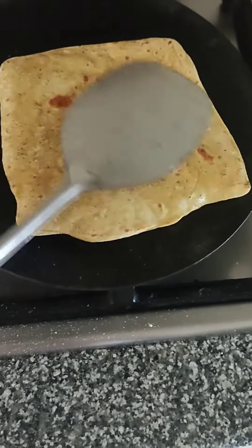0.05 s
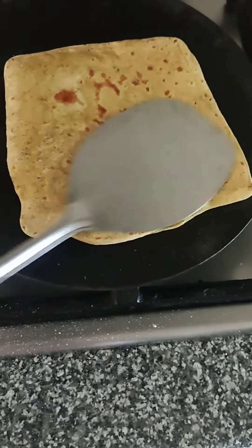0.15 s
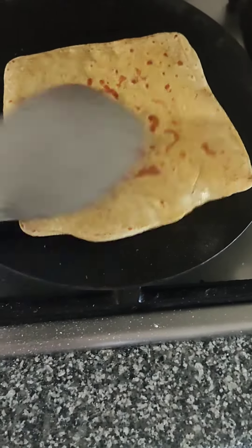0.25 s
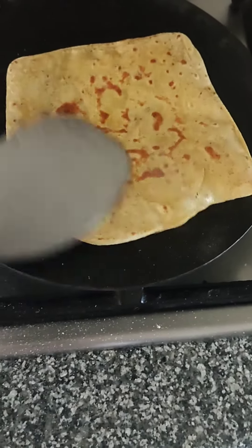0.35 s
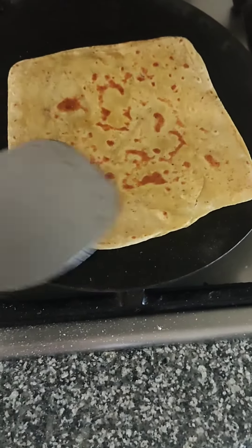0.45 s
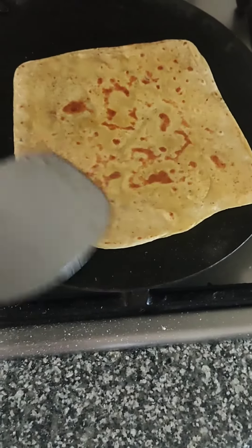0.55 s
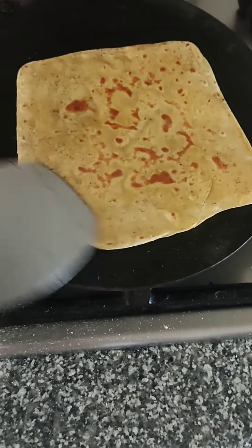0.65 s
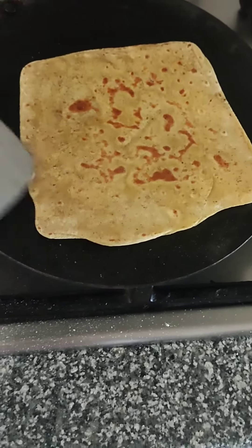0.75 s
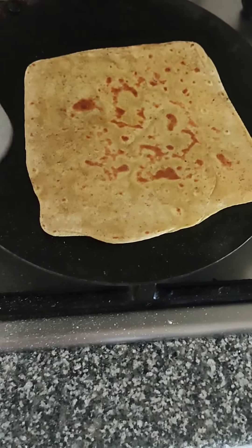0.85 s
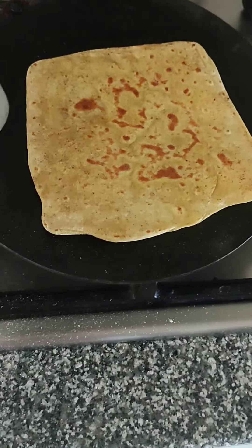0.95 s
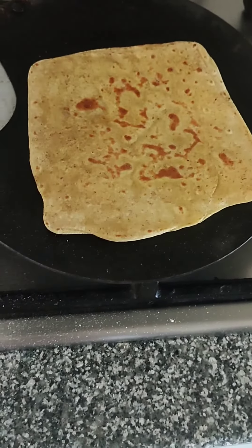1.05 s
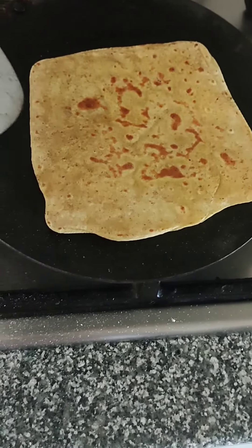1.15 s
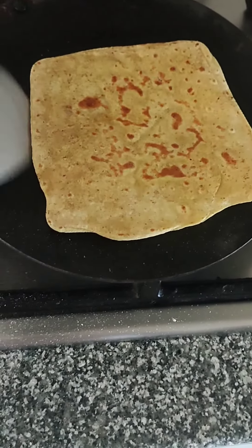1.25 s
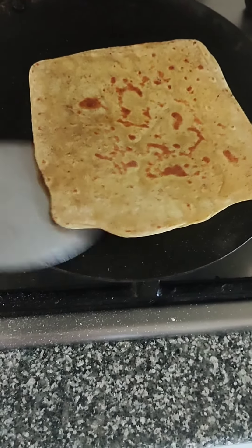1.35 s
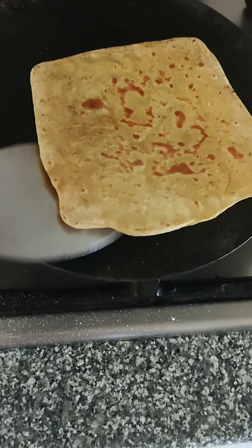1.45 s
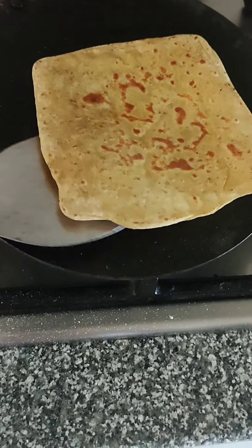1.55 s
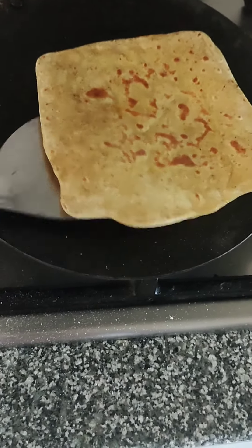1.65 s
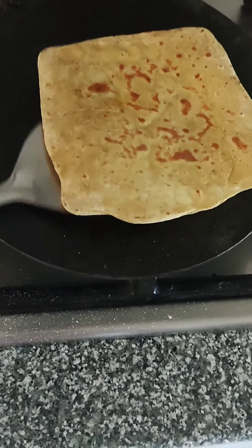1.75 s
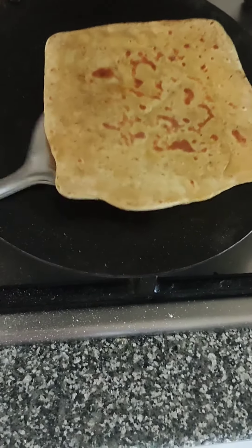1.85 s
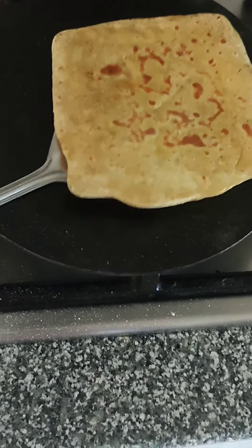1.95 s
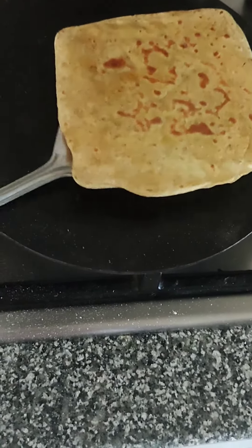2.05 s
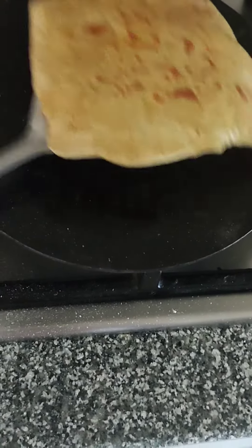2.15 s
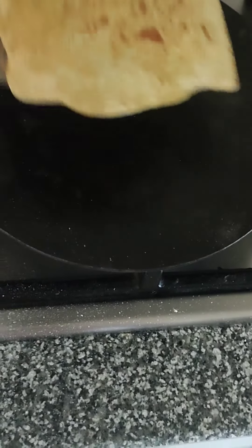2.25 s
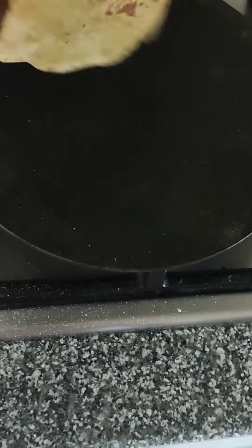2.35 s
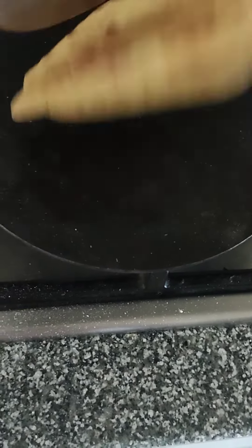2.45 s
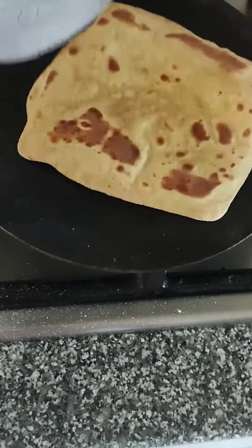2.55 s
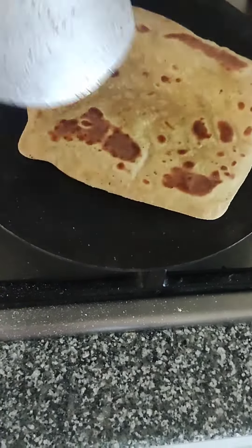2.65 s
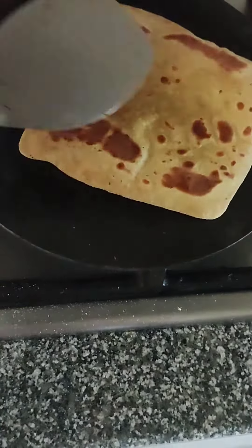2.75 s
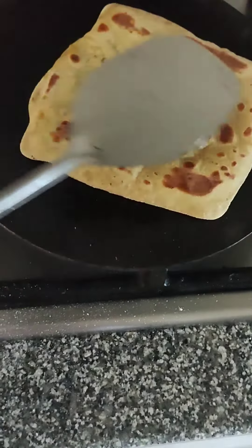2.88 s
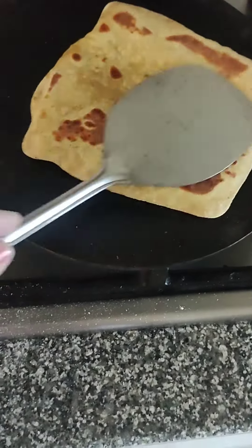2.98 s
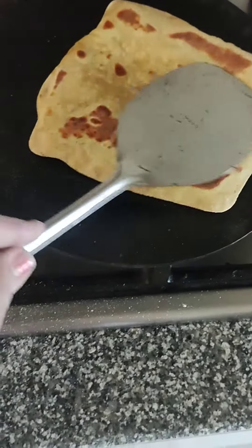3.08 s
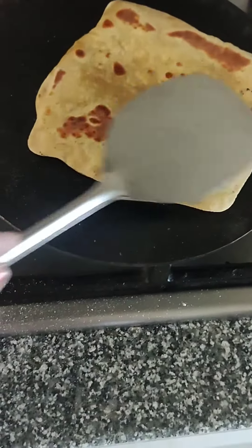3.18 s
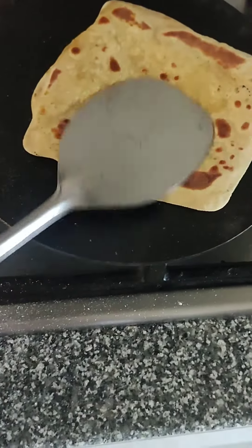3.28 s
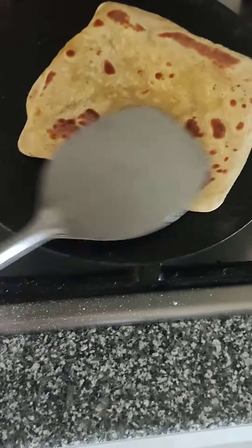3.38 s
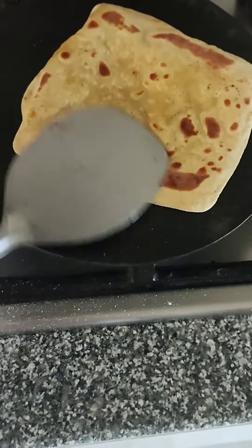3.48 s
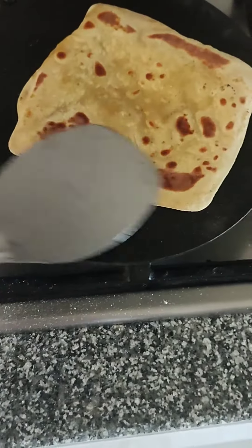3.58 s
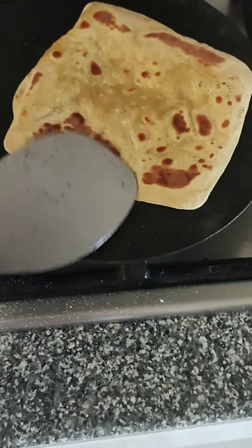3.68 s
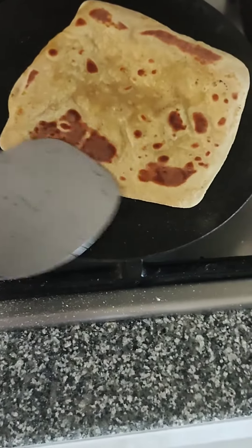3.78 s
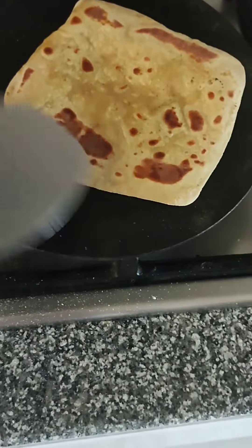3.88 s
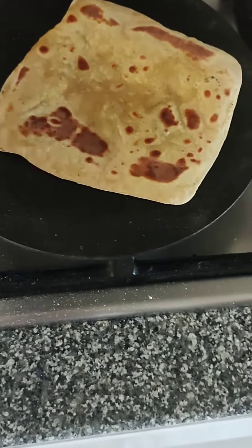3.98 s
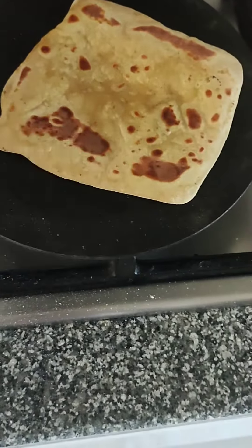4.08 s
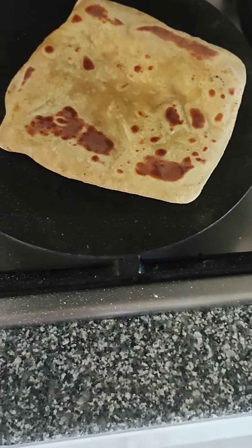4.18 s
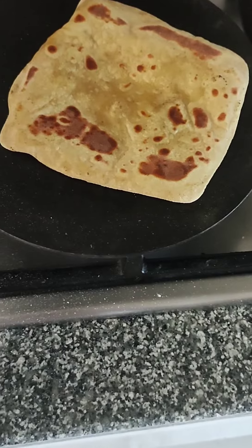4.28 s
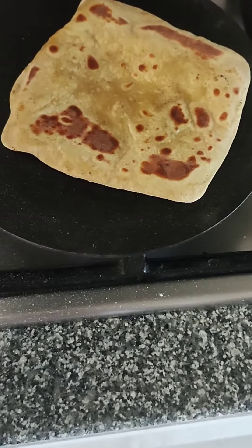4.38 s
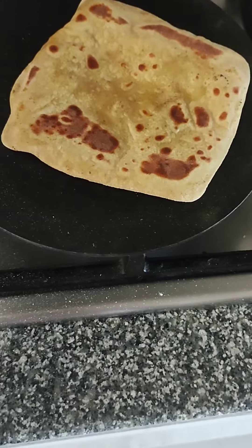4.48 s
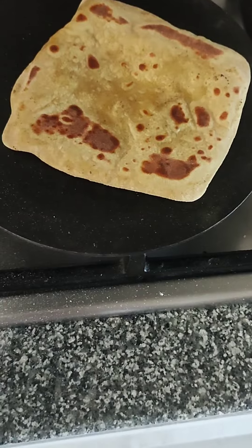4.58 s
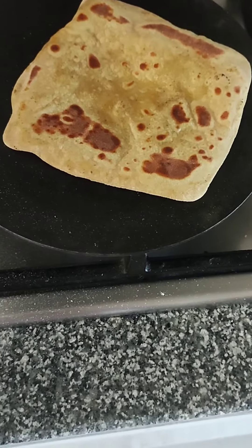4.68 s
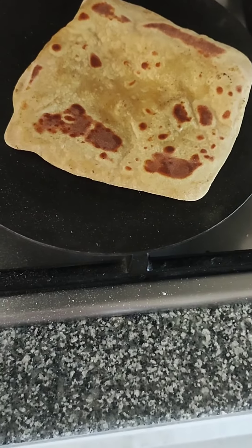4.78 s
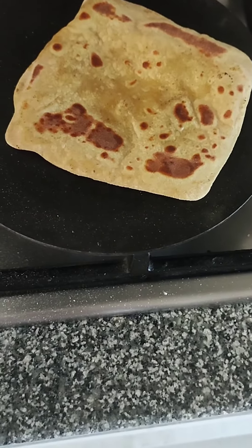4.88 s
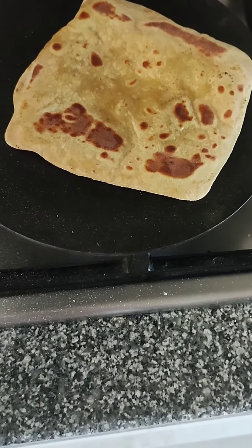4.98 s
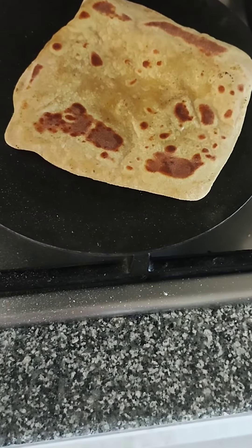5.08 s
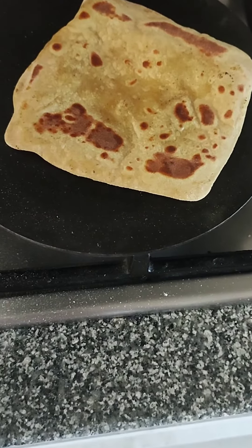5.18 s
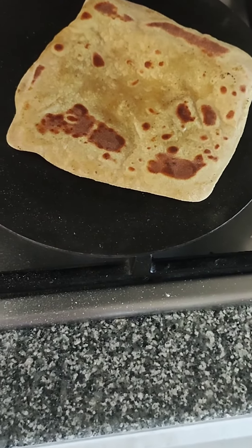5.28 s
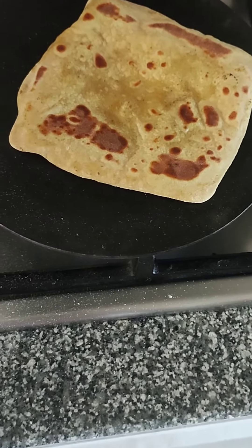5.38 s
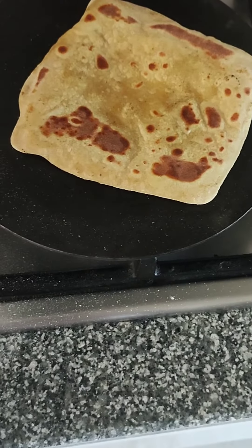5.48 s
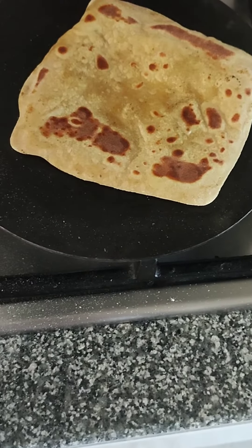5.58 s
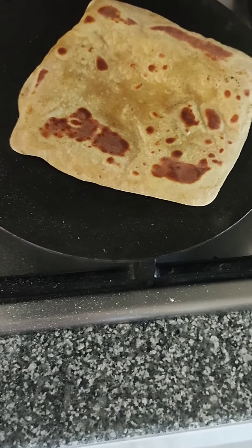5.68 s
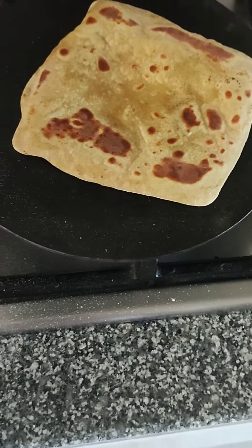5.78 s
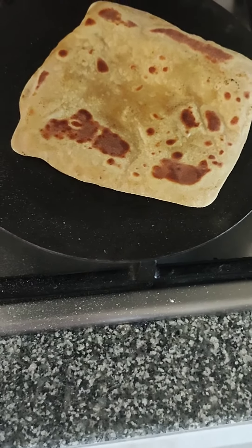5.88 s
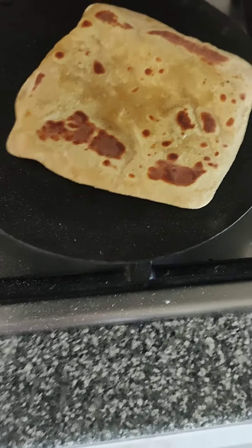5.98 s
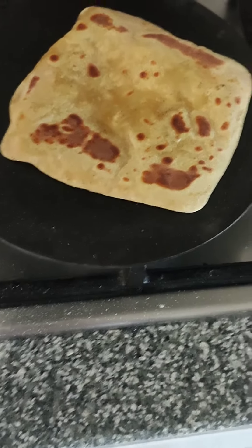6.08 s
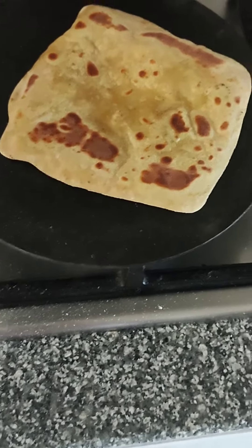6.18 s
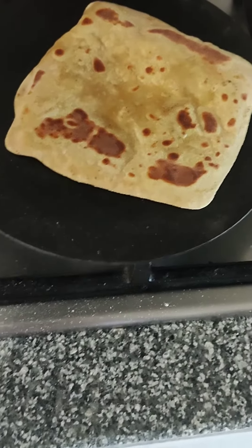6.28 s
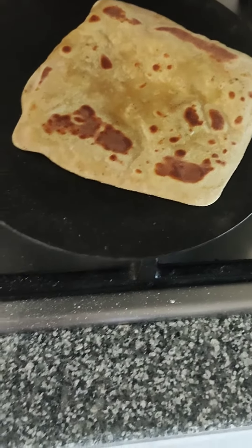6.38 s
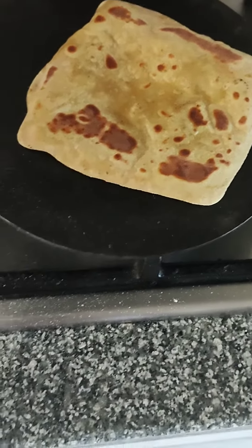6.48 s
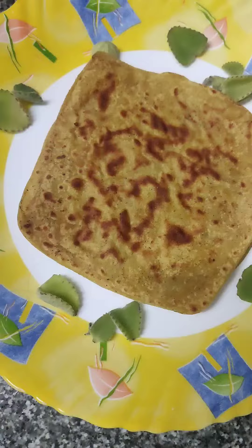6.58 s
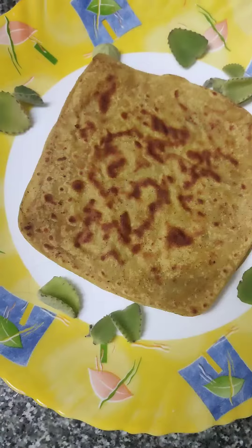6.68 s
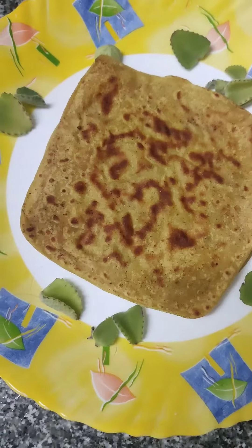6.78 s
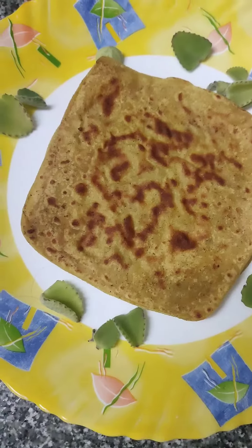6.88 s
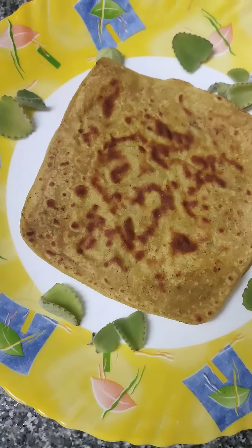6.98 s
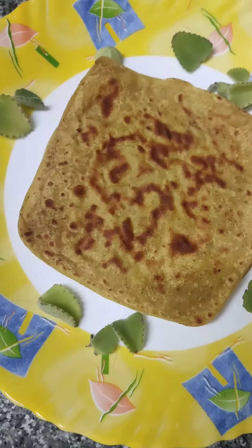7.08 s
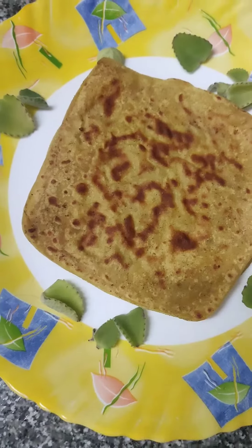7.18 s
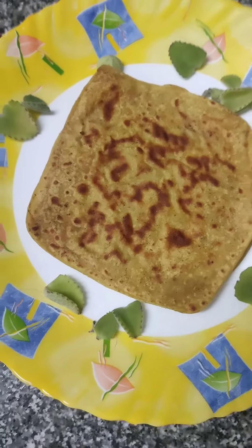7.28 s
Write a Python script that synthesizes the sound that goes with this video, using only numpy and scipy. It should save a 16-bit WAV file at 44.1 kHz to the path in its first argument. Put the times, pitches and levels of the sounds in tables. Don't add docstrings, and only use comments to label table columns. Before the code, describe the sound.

A metal spatula rubs crisp flatbread, scrapes and rings on an iron griddle, flips it with a slap, then fat sizzles before a quiet humming room.

```python
import sys
import numpy as np
from scipy import signal
from scipy.io import wavfile
from scipy.ndimage import uniform_filter1d

SR = 44100
rng = np.random.default_rng(int(sys.argv[2]) if len(sys.argv) > 2 else 0)


def attenuation_scalar(level_db):
    decades = np.asarray(level_db, float) / 20
    return 10 ** decades


def pcm_store(signal):
    levels = np.round(np.clip(np.atleast_2d(signal), -1, 1) * 32767)
    wavfile.write(sys.argv[1], SR, levels.astype(np.int16).T)


N = 323691
CUT_S = 6.557
LAG = 6
EDGE_HZ = 14330


def evened(x):
    return x / np.sqrt(np.mean(x ** 2) + 1e-20)


def read(points, hz):
    f, value = np.transpose(points)
    return np.interp(np.log(hz + 1), np.log(f + 1), value)


def add(mix, s, sound):
    part = mix[..., round(s * SR):][..., :sound.shape[-1]]
    part += sound[..., :part.shape[-1]]


def band(x, lo_hz, hi_hz):
    return signal.sosfilt(signal.butter(2, [lo_hz, min(hi_hz, .45 * SR)], "band", fs=SR, output="sos"), x)


# frequency in Hz, likeness from 0 to 1.
SAME = [(60, 0.75), (130, 0.92), (290, 0.96), (640, 0.2), (1400, 0.31), (3080, 0.24), (6760, 0.2),
        (14800, 0.27)]


def hiss(colour, same=SAME, patchy_db=3.5, flicker_db=3.8, size=512, span=(0, 8)):
    out = np.zeros((2, N))
    part = out[:, span[0] * SR:span[1] * SR]
    frames, hz = 4 * part.shape[1] // size + 5, np.fft.rfftfreq(size, 1 / SR)
    a, b, c, d, patches = rng.standard_normal((frames, len(hz), 5)).T
    patches = uniform_filter1d(uniform_filter1d(patches, 6, 0), 12, 1)
    flicker = uniform_filter1d(rng.standard_normal(frames), 3)
    field_db = patchy_db * evened(patches) + flicker_db * evened(flicker)
    alike = np.clip(read(same, hz), -1, 1)[:, None]
    later = np.exp(-2j * np.pi * hz * LAG / SR)[:, None]
    left = a + 1j * b
    right = alike * left * later + np.sqrt(1 - alike ** 2) * (c + 1j * d)
    level = attenuation_scalar(read(colour, hz)[:, None] + field_db) * (hz < EDGE_HZ)[:, None]
    z = np.array([left, right]) * level
    part[:] = evened(signal.istft(z, nperseg=size, noverlap=3 * size // 4)[1][:, :part.shape[1]])
    return out


def strokes(rows):
    t = np.arange(0, N + 64, 64) / SR
    peak, db, rise, fall, treble_db = np.transpose(rows)[:, :, None]
    away = np.where(t < peak, (peak - t) / rise, (t - peak) / fall)
    power = attenuation_scalar(db - 22 * away ** 1.51) ** 2
    both = power, power * attenuation_scalar(2 * treble_db)
    return [np.interp(np.arange(N) / SR, t, np.sqrt(p.sum(0))) for p in both]


def pressed(sound, rows, split_hz=5000):
    low = signal.sosfiltfilt(signal.butter(2, split_hz, fs=SR, output="sos"), sound)
    body, treble = strokes(rows)
    return body * evened(low) + treble * evened(sound - low)


def ring(modes, longer=0.88, tilt_db=0., seconds=.3):
    t = np.arange(round(seconds * SR)) / SR
    hz, db, t60 = np.transpose(modes)[:, :, None]
    level = attenuation_scalar(db + tilt_db * np.log2(hz / 3000) - 60 * t / (np.minimum(t60, .3) * longer))
    left, apart = rng.random((2, *hz.shape))
    right = left + (apart - .5) * np.minimum(hz / 1200, 1)
    return np.array([(level * np.sin(2 * np.pi * (hz * t + turn))).sum(0) for turn in (left, right)])


def blade(modes, slips):
    step, out = np.arange(slips.shape[1]) / 700, np.zeros(slips.shape)
    for hz, width, db in modes:
        r = np.exp(-np.pi * width / SR)
        wander = evened(uniform_filter1d(rng.standard_normal((2, len(step) // 700 + 2)), 3))
        swell, drift = (np.interp(step, np.arange(len(w)), w) for w in wander)
        turn = np.exp(2j * np.pi * np.cumsum(hz * (1 + .016 * drift)) / SR)
        rung = turn * signal.lfilter([1 - r], [1, -r], slips / turn)
        out += attenuation_scalar(db + 2.2 * swell) * rung.real
    return evened(out)


# frequency in Hz, level in dB per Hz.
TABLE = [(35, -35), (60, -15.5), (104, -13.5), (157, -29.5), (189, -21), (272, -32.5), (358, -23),
         (461, -32), (493, -28), (635, -29.5), (1030, -35.5), (1910, -39.5), (2400, -48.5), (3700, -50.5),
         (14300, -56.5)]
# frequency in Hz, likeness from 0 to 1.
TABLE_SAME = [(60, 0.4), (130, 0.78), (290, 0.78), (640, 0.056), (1400, 0.022), (3080, 0.091), (6760, 0.05),
              (14800, 0.03)]


def table():
    t = np.arange(N) / SR
    waver = attenuation_scalar(2.5 * evened(uniform_filter1d(rng.standard_normal(N), 1500)))
    hum = attenuation_scalar(-54.5) * np.sqrt(2) * waver * np.sin(2 * np.pi * 104.5 * t)
    room = attenuation_scalar(-55) * hiss(TABLE, TABLE_SAME, patchy_db=1.2, flicker_db=.7, size=1024, span=(6, 8))
    back_s, fade_s = 6.585, .26
    return (room + hum) * np.clip((t - back_s) / fade_s, 0, 1) ** 2


# frequency in Hz, level in dB per Hz.
AIR = [(150, -13.5), (200, -5), (270, 0), (454, 0.5), (683, -12.5), (886, -5.5), (1330, -14), (2850, -17),
       (4200, -20), (7200, -12), (14300, -53.5)]
LOWS = [(60, -24), (100, -2.5), (135, 10.5), (165, -6.5), (190, -34)]
SUBS = [(18, -5), (36, 1), (48, -3.5), (70, -4.5), (110, -43.5)]
# time in seconds, rumble level in dB.
SHAKE = [(0, -62), (.8, -57), (1.1, -58), (1.44, -59), (1.85, -60), (2.15, -52), (3.23, -54), (3.73, -58),
         (4.11, -58), (5.2, -61), (5.45, -62), (6.56, -61)]


def stove_air():
    air = attenuation_scalar(-62) * hiss(AIR, patchy_db=1.8, flicker_db=.6, size=2048)
    drone = attenuation_scalar(-62) * hiss(LOWS, patchy_db=1.0, flicker_db=3.0, size=2048)
    shake = attenuation_scalar(np.interp(np.arange(N) / SR, *np.transpose(SHAKE)))
    return air + drone + shake * hiss(SUBS, patchy_db=-2.5, flicker_db=5.5, size=4096)


# start in seconds, length in seconds, level in dB.
SIZZLE = [
    (4.24, 0.67, -66.5),
    (4.914, 0.25, -67),
    (5.315, 0.716, -56.5),
    (6.187, 0.46, -56.5),
]
# frequency in Hz, level in dB per Hz.
FIZZ = [(1470, -41), (2500, -20), (4290, -17), (5330, -10.5), (6290, -0.5), (7410, -2.5), (8680, -6.5),
        (10500, -9), (12600, -3.5), (14400, -8.5), (15000, -33.5)]


def fat():
    t = np.arange(N) / SR
    power = attenuation_scalar(2 * -72.5) * (t > 3.85)
    for s, length, db in SIZZLE:
        power = power + attenuation_scalar(2 * (db - 7 * (t - s))) * (t > s) * (t < s + length)
    level = uniform_filter1d(np.sqrt(power), 400)
    return level * hiss(FIZZ, patchy_db=.8, flicker_db=.7, span=(3, 7))


# start in seconds, peak in dB, pitch in Hz, t60 in seconds.
THUDS = [
    (0.251, -38, 117, 0.066),
    (0.354, -40, 278, 0.056),
    (0.985, -40, 146, 0.09),
    (1.719, -43.5, 246, 0.11),
    (3.169, -39, 129, 0.041),
    (4.7, -46.5, 240, 0.093),
    (5.35, -44.5, 247, 0.14),
    (5.692, -56, 370, 0.02),
]


def thuds():
    out, t = np.zeros((2, N)), np.arange(round(.2 * SR)) / SR
    for s, db, hz, t60 in THUDS:
        add(out, s, attenuation_scalar(db - 60 * t / t60) * np.sin(2 * np.pi * hz * t) * np.minimum(t / 0.00039, 1))
    return out


def creak(db, pan_db, snap_db):
    t, (gap, share, low) = np.arange(4000) / SR, rng.random(3)
    pull_s = 0.0033

    def pull(s, wide):
        return -np.exp(-((t - s) / wide) ** 2)

    second = (.5 + .6 * share) * pull(pull_s + .0013 + .0011 * gap, .00045)
    bulge = -.3 * pull(.0008, .0006)
    slips = pull(pull_s, .00022) + second + bulge
    case_hz = 124 * (0.87 + 0.2 * low)
    body = 0.39 * np.sin(2 * np.pi * case_hz * (t - pull_s) + 4.43) * attenuation_scalar(-60 * t / 0.11)
    late = np.clip((t - pull_s) / .0003, 0, 1)
    snap = band(rng.standard_normal((2, len(t))), 1100, 3300) * attenuation_scalar(17 + snap_db - 60 * t / 0.031) * late
    after = band(rng.standard_normal(len(t)), 192, 783) * attenuation_scalar(10.5 - 60 * t / 0.051)
    start = np.minimum(t / 0.0011, 1)
    return attenuation_scalar(db - 0.5) * attenuation_scalar([[pan_db / 2], [-pan_db / 2]]) * (slips + start * (body + snap + after))


# start in seconds, peak in dB, left-right in dB, snap in dB.
CREAKS = [(0.247, -40, 2, -6), (0.352, -39, -1.0, -16), (0.979, -37, 2, -12), (1.239, -37, 1.5, -11),
          (1.648, -36.5, 1.5, -11), (1.79, -40.5, 0, -12), (1.817, -35.5, 1.5, -13),
          (2.271, -50.5, -5, -14), (2.385, -39, 0.5, -22), (2.475, -35, 1.5, -18), (2.895, -42, 0, -19),
          (3.107, -43, 1, -17), (3.161, -36.5, 3, -20), (3.194, -43, -2.0, -25), (3.324, -42, 0.5, -13),
          (3.675, -42, 0.0, -9), (4.017, -41, 1, -22), (4.115, -59, -2.0, -22), (4.22, -44, -1, -22),
          (4.261, -35.5, 0, -16.5), (4.325, -46, 0, -29), (4.43, -44, -1, -24), (4.628, -45, 1, -23),
          (4.664, -43, 0, -6), (4.848, -44, -2.5, -26), (5.092, -42.5, 1.5, -20), (5.279, -35, 0.5, -17),
          (5.461, -41, 1, -17), (5.69, -37.5, 1.5, -16.5), (5.984, -40.5, 1.5, -17.5),
          (6.188, -44.5, -1.5, -26), (6.207, -37, 0, -20), (6.549, -40, 4, -16)]
# start in seconds, peak in dB, left-right in dB, snap in dB.
WRIST_CREAK = (2.549, -43, 0, -16)


def creaks():
    out = np.zeros((2, N))
    for s, *row in CREAKS + [WRIST_CREAK]:
        add(out, s, creak(*row))
    return out


# frequency in Hz, t60 in seconds.
KITCHEN = [(120, 0.62), (400, 0.52), (1000, 0.49), (2500, 0.45), (6000, 0.42), (14000, 0.16)]


def kitchen(x):
    echoes = np.zeros((2, SR // 2))
    at = np.arange(80, SR // 2 - 20, 20) + rng.integers(0, 20, (2, (SR // 2 - 81) // 20))
    np.put_along_axis(echoes, at, rng.choice([-1., 1.], at.shape), 1)
    echoes[1] += band(echoes[0] - echoes[1], 40, 580)
    hz, t, z = signal.stft(echoes, SR, nperseg=256)
    tail = signal.istft(z * attenuation_scalar(-60 * t / read(KITCHEN, hz)[:, None]), SR, nperseg=256)[1]
    return signal.fftconvolve(x, tail / np.linalg.norm(tail, axis=1)[:, None], axes=1)[:, :N]


# frequency in Hz, level in dB per Hz.
BREAD = [(180, -32), (300, -1.5), (507, -21.5), (800, -1.5), (1400, -2), (2300, -1), (3000, -6),
         (4600, -8.5), (7180, -4.5), (9330, -11.5), (13600, -10), (14300, -21), (15000, -48.5)]
# peak in seconds, pressure in dB, rise and fall in seconds, treble in dB.
RUBS = [
    (.06, -61, 0.13, 0.091, -0.5),
    (0.139, -47.5, 0.097, 0.12, -6.5),
    (0.283, -40.5, 0.097, 0.1, -5.5),
    (0.42, -50, 0.12, 0.19, -1.5),
    (0.631, -55.5, 0.093, 0.046, 1),
    (0.756, -59, 0.16, 0.13, 3.5),
    (3.05, -50.5, 0.05, 0.052, -8),
    (3.02, -64, 0.036, 0.14, 2),
    (3.17, -63.5, 0.11, .1, 0.5),
        (3.001, -58, .004, .03, -3), (3.272, -47, 0.028, 0.059, -7), (3.27, -55.5, 0.044, .2, 1),
           (3.49, -58.5, 0.48, 0.55, 0.5), (3.388, -51, .04, 0.024, -10), (3.37, -57, .06, 0.055, 7),
           (3.454, -48.5, 0.023, 0.097, -0.5), (3.578, -48, 0.06, 0.031, -4),
           (3.668, -50.5, 0.066, 0.044, -4.5), (3.75, -54.5, 0.077, 0.072, -7),
           (3.84, -58, 0.028, 0.084, -2.5)]


def rub():
    return pressed(hiss(BREAD, patchy_db=2.5, flicker_db=1.0, size=256, span=(0, 4)), RUBS)


# frequency in Hz, width in Hz, level in dB.
ENTERING = [(442, 33, -1.5), (984, 76, -12.5), (1590, 18, -0.5), (2010, 25, -12), (2250, 35, 5),
            (2670, 59, -2), (3056, 50, 1), (3920, 58, -2)]
WEDGED = [(449, 39, -1.5), (847, 52, -8), (1080, 83, -3), (2010, 220, -3.5), (2220, 21, -18),
          (2580, 67, -7), (3120, 64, -5), (3770, 110, -9)]
LOADED = [(438, 81, -10.5), (1050, 400, -12), (1800, 210, -7), (2200, 30, -5.5), (2630, 38, -7),
          (3120, 44, -4), (3550, 89, -20), (3780, 130, -8.5)]
LIFTED = [(960, 140, -0.5), (1616, 30, 0), (2075, 72, 7), (3450, 200, -5), (4770, 410, -20), (5900, 42, 0),
          (6050, 42, -11), (6120, 20, 0), (7040, 92, -11), (7890, 55, -3)]
BLADE = [(4960, 35, -13), (6290, 160, -11), (7130, 67, -10), (7690, 110, -7.5), (8930, 75, -31),
         (10400, 110, -10), (11700, 140, -20), (12750, 150, -18.5), (12940, 140, -12)]
# start in seconds, end in seconds.
SLIDES = [
    (.92, 1.41),
    (1.41, 1.69),
    (1.69, 2.3),
    (4.85, 5.2),
]
# frequency in Hz, level in dB per Hz.
RASP = [(180, -8.5), (300, -27), (1330, -17.5), (2650, -10.5), (4690, -15), (6300, -13), (12700, -17.5),
        (14300, -19), (15000, -59)]
# peak in seconds, pressure in dB, rise and fall in seconds, treble in dB.
SCRAPES = [
    (0.937, -46, 0.021, 0.05, -13),
    (1.0, -73, .06, 0.41, 4),
    (1.301, -46, 0.08, 0.33, -0.5),
    (1.43, -46, 0.25, 0.36, -7),
    (1.699, -43, 0.0028, 0.032, -9),
    (1.74, -51.5, 0.28, 0.52, -4.5),
    (2.021, -60, 0.93, 0.09, 1.5),
    (4.94, -60, 0.07, 0.24, -3.5),
]


def scrape():
    uneven = attenuation_scalar(2.0 * evened(uniform_filter1d(rng.standard_normal(N), 250)))
    slips = rng.standard_normal((2, N)) * uneven
    slips[1] = 0.93 * slips[1] + 0.51 * np.roll(slips[0], LAG)
    steel = np.zeros((2, N))
    contacts = ENTERING + BLADE, WEDGED + BLADE, LOADED + BLADE, LIFTED
    for (start, end), modes in zip(SLIDES, contacts):
        spell = slice(round(start * SR), round(end * SR))
        steel[:, spell] = blade(modes, slips[:, spell])
    steel = signal.sosfilt(signal.butter(12, EDGE_HZ, fs=SR, output="sos"), steel)
    rasp = attenuation_scalar(-2.1) * hiss(RASP, patchy_db=5.5, flicker_db=0.0, span=(0, 6))
    return pressed(steel + rasp, SCRAPES)


# start in seconds, length in seconds, pitch in Hz, level in dB.
CATCHES = [(1.28, 0.053, 3080, -43), (1.29, 0.14, 2010, -47.5), (1.33, 0.072, 2250, -67),
           (1.36, 0.19, 2730, -43), (1.4, 0.16, 424, -52.5), (1.47, 0.023, 2620, -51),
           (1.48, 0.14, 1080, -55.5), (1.695, 0.11, 2630, -48.5), (1.835, .14, 1890, -58),
           (1.87, 0.061, 3120, -50), (.24, 0.1, 1374, -50), (.28, 0.042, 2060, -53),
           (3.03, 0.032, 2510, -55), (3.728, .06, 2390, -58.5), (3.831, 0.045, 2290, -59)]


def catches():
    out = np.zeros((2, N))
    for s, length, hz, db in CATCHES:
        t = np.arange(round(length * SR)) / SR
        slips = rng.standard_normal(len(t))
        tone = blade([(hz, 55, 0)], np.array([slips, np.roll(slips, LAG)]))
        add(out, s, attenuation_scalar(db) * tone * np.sin(np.pi * (t / length) ** .7) ** .5)
    return out


# frequency in Hz, level in dB, t60 in seconds.
RING = [(1174, -1, .15), (1986, -4, .14), (2315, -4, .14), (2584, -2, .08), (3020, -5, .2), (3397, -14, .3),
        (4190, -16, .2), (5480, -18, .3), (5930, -14, .15), (6293, -8, .12), (7849, -8, .17),
        (8985, -14, .08), (10750, -10, .03), (11700, -8, .02)]


def tap(db, longer, crack_db, clear_db, body_hz, body_db):
    t = np.arange(round(.2 * SR)) / SR
    modes = ring(RING, longer, min(crack_db, 0) / 4, seconds=.2)
    chatter = 1 + 0.39 * evened(uniform_filter1d(rng.standard_normal(len(t)), 120))
    noise = rng.standard_normal(modes.shape)
    crack = attenuation_scalar(crack_db - 60 * t / (.045 * longer)) * band(noise, 1900, 14500)
    body = attenuation_scalar(body_db - 60 * t / (.12 * longer)) * band(noise, body_hz / 1.3, body_hz * 1.3)
    sound = attenuation_scalar(clear_db) * chatter * modes / abs(modes).max() + crack + body
    return attenuation_scalar(db) * sound * np.minimum(t / 0.0004, 1)


# start in seconds, peak in dB, ring factor, crack in dB, body in Hz.
TAPS = [(0.9229, -37, 0.81, 5, 2450), (1.293, -38, 0.52, -8, 3000), (1.478, -42.5, 0.45, -14, 2600),
        (1.496, -51, .4, -9, 2600), (1.633, -49, .4, -12, 2000), (1.6981, -34, 0.4, -6, 2590),
        (1.84, -39, 1.3, -2, 2420), (4.687, -45, 0.59, -17, 1900), (2.042, -42.5, 0.066, 12, 7700),
        (2.087, -50, 0.3, -2, 7200), (2.278, -28.5, 0.064, -25, 1820), (3.027, -44, .3, -12, 1600),
        (3.265, -38, 0.49, -12, 1800), (3.0435, -34, 0.3, -8, 2330), (4.667, -46, 0.53, -15, 2300),
        (4.6657, -40.5, 0.55, -11, 920), (5.317, -36.5, 1.9, -2.5, 1070)]


def taps():
    out = np.zeros((2, N))
    for s, db, longer, crack_db, body_hz in TAPS:
        free = s < 1
        clear_db = 8 if free else -12 + .3 * crack_db
        add(out, s, tap(db, longer, crack_db, clear_db, body_hz, -3 if free else 6))
    return out


# frequency in Hz, level in dB, t60 in seconds.
RESTING = [(1030, -2, 0.095), (1188, -1, 0.069), (1840, -8.5, .15), (2277, -10, .25), (2770, -4, 0.065),
           (3290, -7, .1), (4110, -11, 0.11), (4340, -16, .1), (5590, -11, 0.15), (6700, -12, .1),
           (7550, -10, 0.17), (8850, -13, .15)]


def set_down():
    out = np.zeros((2, N))
    add(out, 5.317, attenuation_scalar(-43) * ring(RESTING))
    return out


# frequency in Hz, level in dB, t60 in seconds.
GRIDDLE = [(285, -1, 0.4), (430, 14, .06), (485, 9, .1), (515, 0, 0.2), (668, -8, 0.3), (802, -3, 0.28),
           (931, -9, .3), (1058, -5, .2), (1227, -13, 0.26), (1432, -13, 0.25), (1800, -6, 0.12),
           (2200, 1, .1), (146, 3, 0.2), (2480, 1, 0.06)]


def slap():
    out, lead_s, bounce_s = np.zeros((2, N)), .007, 0.0076
    t = np.arange(round(.4 * SR)) / SR - lead_s
    u, lag = np.maximum(t, 0), [[0], [.00032]]
    stereo = (2, len(t))
    v = (t - lag - .00022) / [[.00016], [.0002]]
    pulse = np.exp(-v ** 2) - .5 * np.exp(-((v - 3.1) / 0.51) ** 2)
    pulse = pulse * attenuation_scalar([[-1.8], [-4.3]])
    rise = np.clip((t + 0.0056) / 0.0015, 0, 1) ** 2 * attenuation_scalar(-60 * u / 0.038)
    puff = attenuation_scalar(-23) * band(rng.standard_normal(stereo), 2500, 9100) * rise
    low = band(rng.standard_normal(len(t)), 330, 600)
    high = band(rng.standard_normal(len(t)), 600, 1250)
    thump = attenuation_scalar([[-14.5], [-9.5]]) * low + attenuation_scalar([[-9], [-14]]) * high
    thump = thump * attenuation_scalar(-60 * u / 0.068) * (t > .001)
    far = attenuation_scalar(-24.5 - 60 * (t - bounce_s) / 0.048) * (t > bounce_s)
    far = far * band(rng.standard_normal(stereo), 1400, 7000)
    crust = attenuation_scalar(-16 - 60 * u / 0.05) * band(rng.standard_normal(stereo), 1200, 2900) * (t > 0)
    boom = attenuation_scalar(-21 - 60 * u / 0.45) * np.sin(2 * np.pi * 66 * u) * np.minimum(u / 0.27, 1)
    iron = attenuation_scalar(-29.5) * ring(GRIDDLE, seconds=.4) * np.clip(t / .003, 0, 1)
    add(out, 2.5664 - lead_s, pulse + puff + far + thump + crust + boom + iron)
    return out


# time in seconds, deflection as a share of full scale.
FINGER = [
    (6.5886, 0.0),
    (6.619, -0.097),
    (6.6803, -0.418),
    (6.6975, -0.475),
    (6.711, -0.577),
    (6.737, -0.604),
    (6.7658, -0.746),
    (6.795, -0.836),
    (6.895, -0.874),
]
# time in seconds, jump as a share of full scale.
SLIPS = [
    (6.58864, -.057),
    (6.66759, .178),
    (6.73106, .16),
    (6.78961, .066),
    (6.79002, .064),
    (6.85062, .072),
]
# time in seconds, extra push, half length in seconds.
TREMORS = [(6.6607, -0.02, 0.0042), (6.6655, 0.03, 0.0025), (6.7665, .025, .003), (6.7815, .025, .004),
           (6.7096, -0.036, 0.0037), (6.7333, 0.033, 0.0016), (6.7383, 0.039, 0.0023),
           (6.749, 0.029, 0.0064), (6.7748, -0.043, 0.004), (6.8201, 0.046, 0.0058),
           (6.8292, 0.016, 0.0025), (6.8337, 0.045, 0.0017), (6.8406, 0.075, 0.0031),
           (6.852, 0.063, 0.0032), (6.8691, 0.075, 0.0106)]
# time in seconds, height, length in seconds.
NUDGES = [
    (6.749, -0.026, 0.0032),
    (6.7635, 0.027, 0.0026),
    (6.8145, 0.029, 0.0026),
    (6.8335, 0.031, 0.0028),
    (7.03, 0.012, 0.045),
    (7.064, -.011, 0.02),
    (7.206, -.006, .02),
]


def finger():
    t, (s, deflection) = np.arange(N) / SR, np.transpose(FINGER)
    jumps = sum(jump * np.clip((t - at) * SR / 1.5 + .5, 0, 1) for at, jump in SLIPS)
    tremor = sum(push * np.exp(-abs((t - at) / half) ** 3) for at, push, half in TREMORS)
    skin = attenuation_scalar(-63) * evened(band(rng.standard_normal(N), 90, 450)) * (t > s[0]) * (t < s[-1])
    creep = np.exp(-np.maximum(t - s[-1], 0) / .225)
    right = (np.interp(t, s, deflection) + jumps - tremor) * creep
    left = sum(h * np.exp(-abs(2 * (t - at) / d) ** 2) for at, h, d in NUDGES)
    return np.array([left, right + skin])


def scene():
    floor = stove_air() + fat()
    grip = thuds() + creaks()
    friction = rub() + scrape()
    hits = catches() + taps() + set_down() + slap()
    echo = attenuation_scalar(-8.0) * kitchen(hits + 1.14 * grip + 0.74 * friction)
    near = hits + echo + grip + 0.79 * friction
    before_cut = np.clip((CUT_S - np.arange(N) / SR) * 500, 0, 1)
    return (near + floor) * before_cut + table() + finger()


def roll_off(x):
    return signal.sosfilt(signal.butter(12, 15450, fs=SR, output="sos"), x)


def record(dry):
    port = signal.firwin(127, 14700, fs=SR)
    heard = signal.oaconvolve(dry, port[None], "same")
    return roll_off(heard)


dry = scene()
out = record(dry)
pcm_store(out)
```